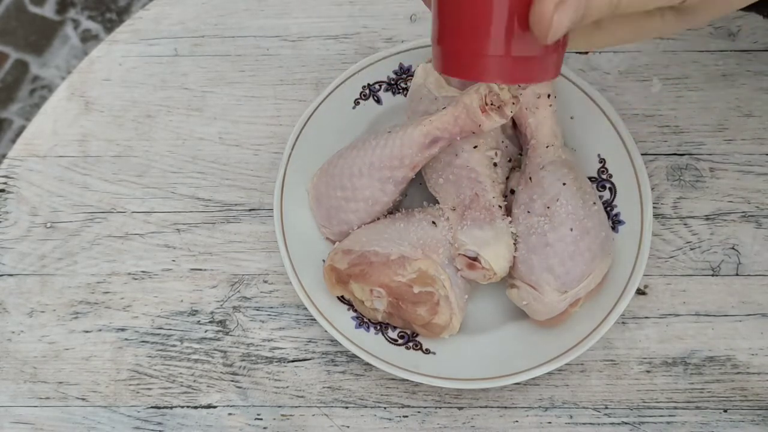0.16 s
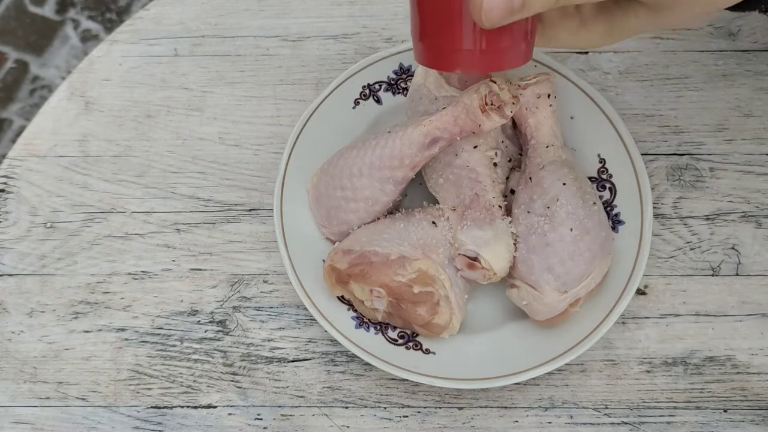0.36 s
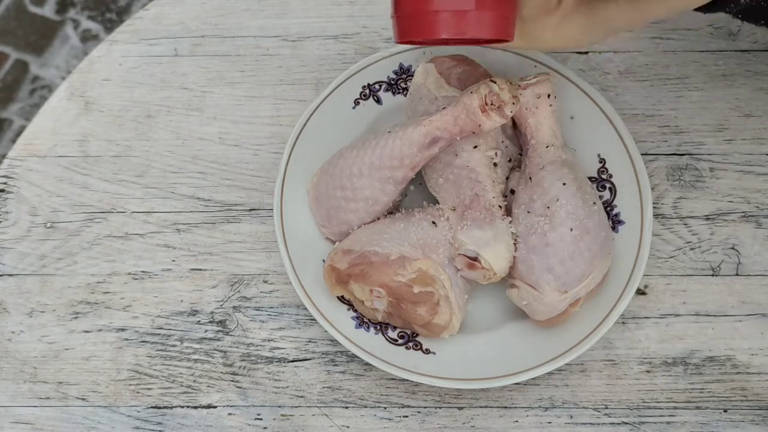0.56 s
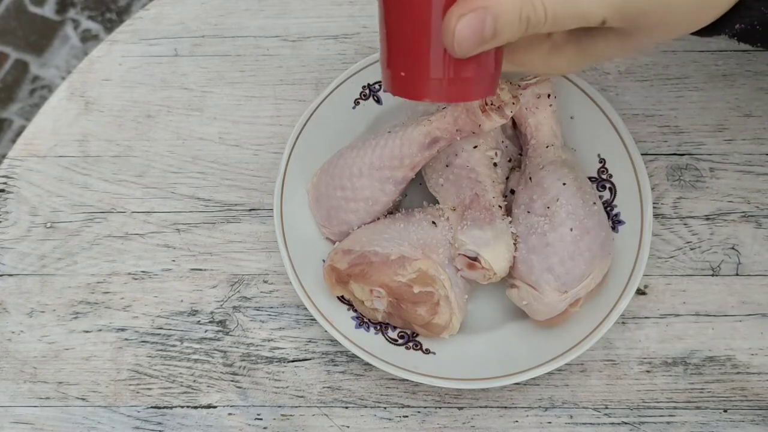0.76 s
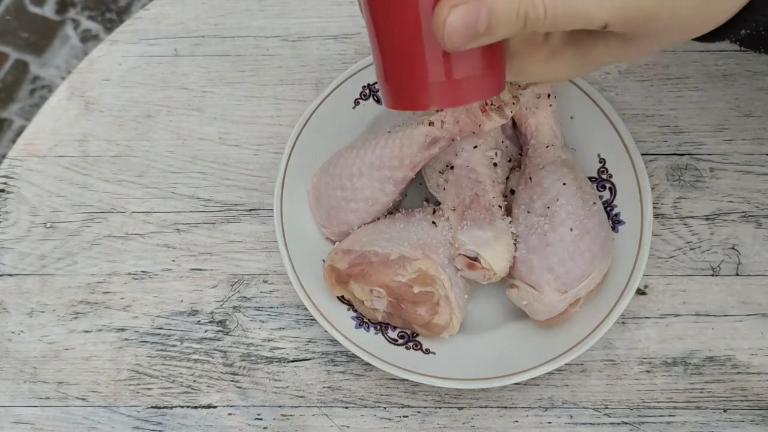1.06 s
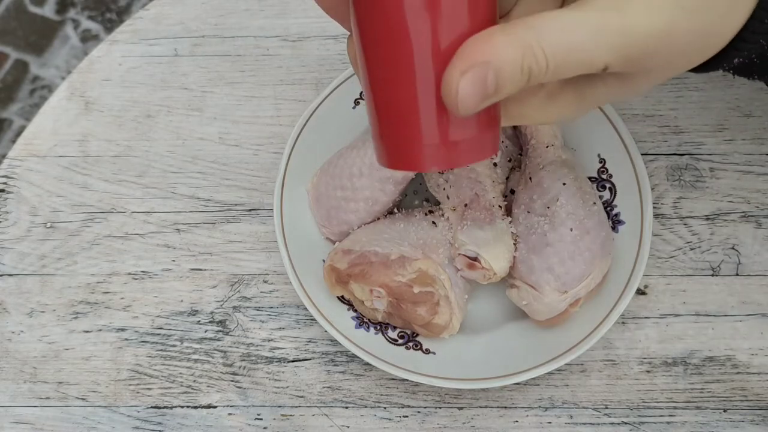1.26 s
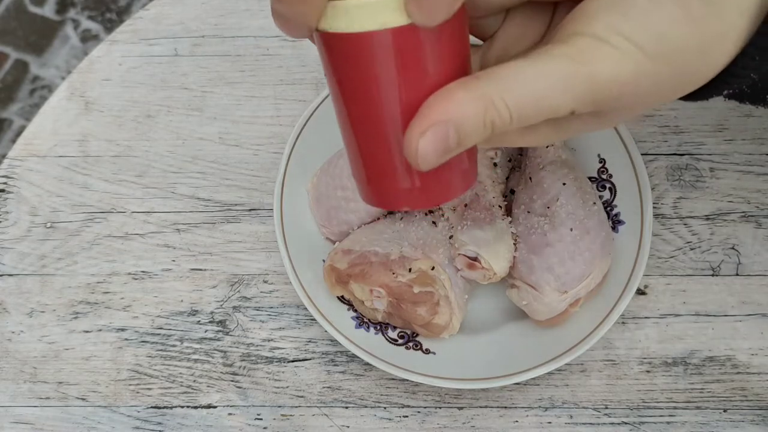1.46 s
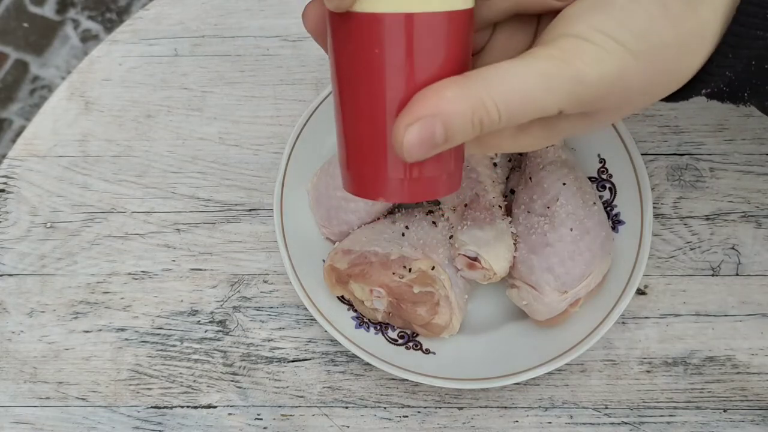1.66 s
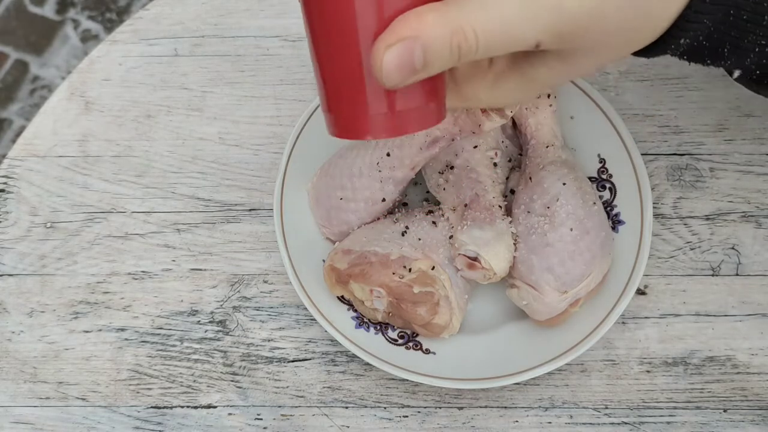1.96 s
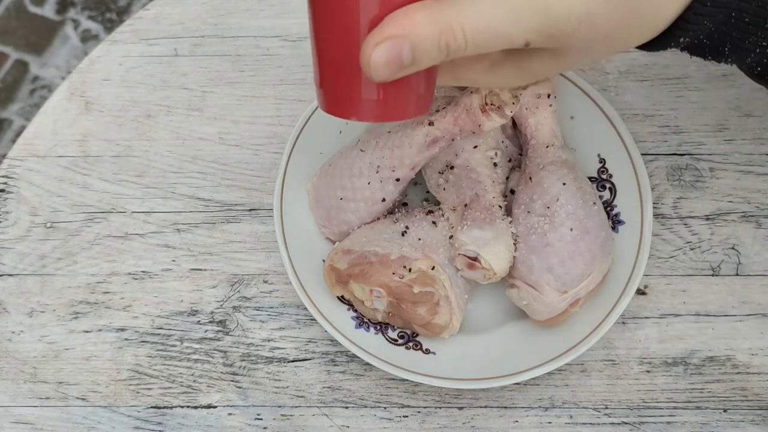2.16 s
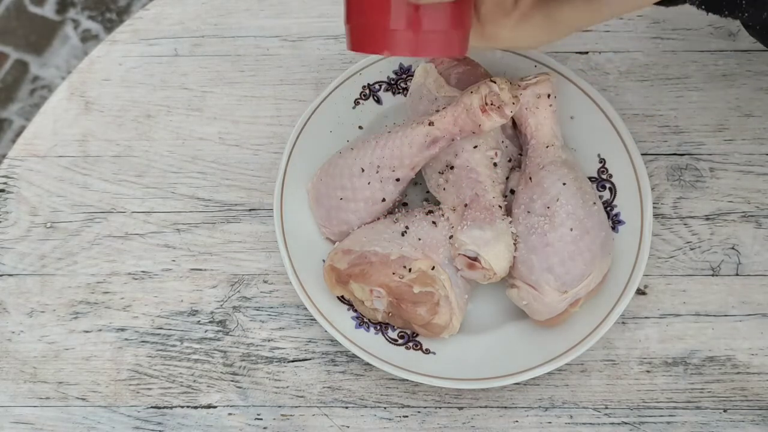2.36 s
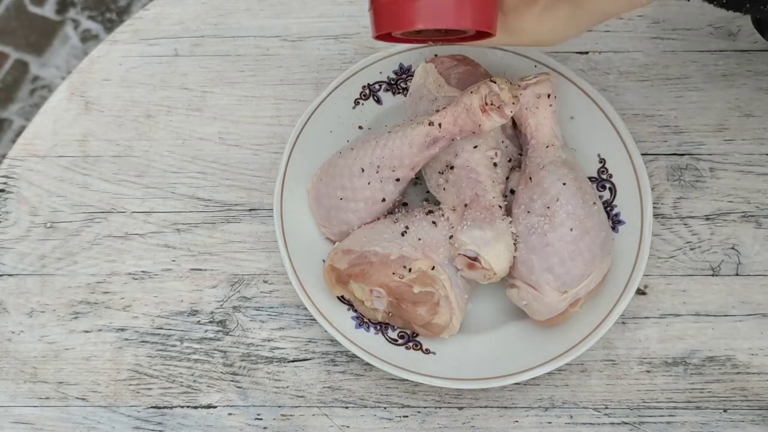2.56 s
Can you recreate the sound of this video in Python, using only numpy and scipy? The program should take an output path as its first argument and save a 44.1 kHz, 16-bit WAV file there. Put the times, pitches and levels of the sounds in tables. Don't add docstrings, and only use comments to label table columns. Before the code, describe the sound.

A plastic pepper mill grinds in short hand twists, close and dry outdoors. Faint grit opens, low hollow crunches follow from 0.2 to 0.6 s, then brighter rattling clicks until 1.0. Firmer twists crackle from 1.05 to 1.6, with sharp snaps around 1.72 and 1.85. More grinding comes at 2.1; the loudest cracks cluster at 2.4 and 2.52, then fade into faint rumble and hiss.

```python
import sys
import numpy as np
from scipy import signal
from scipy.fft import rfft, irfft
from scipy.io import wavfile
from scipy.ndimage import uniform_filter1d

SR = 44100
rng = np.random.default_rng(int(sys.argv[2]) if len(sys.argv) > 2 else 0)


def waveform_to_disk(signal):
    frames = np.transpose(np.atleast_2d(signal))
    scaled = np.clip(frames, -1, 1) * 32767
    samples = np.round(scaled).astype(np.int16)
    wavfile.write(sys.argv[1], SR, samples)


def attenuation_scalar(level_db):
    decades = np.asarray(level_db, float) / 20
    return 10 ** decades


N = 119070

# (frequency [Hz], density [dB per Hz])
AIR_SHARED = [(15, -58), (25, -31), (129, -5.5), (274, -19), (457, -17.5), (1380, -23), (1530, -20),
              (2560, -30), (15500, -29.5)]
AIR_DIFFERENCE = [(15, -44), (25, -24.5), (684, -22.5), (762, -24), (919, -17), (997, -30), (1200, -12.5),
                  (1340, -25), (15500, -51)]
# (time [s], level [dB], pitch [Hz],
# decay [s])
CHIPS = [(0.4802, -27.5, 870, 0.0025), (0.491, -31, 1500, .002), (0.5, -31.5, 414, 0.025),
         (0.517, -27, 7070, 0.0024), (1.724, -14, 4110, 0.0031), (1.724, -14, 9700, 0.0021),
         (1.7245, -24, 6690, 0.0053), (1.726, -20, 840, 0.0026), (1.729, -28, 9330, 0.0036),
         (1.765, -31.5, 10100, .002), (2.086, -25, 2810, 0.0021), (2.0861, -22.5, 6940, .002),
         (2.087, -30, 5760, .002), (2.144, -24, 3070, 0.0023), (2.405, -22, 8430, 0.0038),
         (2.4057, -13, 10100, 0.0019), (2.4074, -16, 5820, 0.0028), (2.406, -25, 8700, .0015),
         (2.409, -16, 1123, 0.0031), (2.411, -21.5, 9100, 0.0026), (2.422, -22, 8600, 0.0034),
         (2.514, -15.5, 7030, 0.0038), (2.517, -28, 5100, 0.0015), (2.563, -38, 7100, 0.0026),
         (0.222, -36, 13600, 0.022), (0.241, -31, 7100, .002), (1.392, -26, 6860, 0.0023),
         (1.512, -33.5, 705, .004)]
# (time [s], level [dB], pitch [Hz], decay [s])
CRUNCHES = [(0.308, -36, 470, 0.0046), (0.326, -34, 454, 0.01), (0.343, -33, 424, 0.01),
            (0.365, -39, 493, 0.0071), (0.595, -36, 324, .01), (0.615, -40, 372, 0.0074),
            (0.638, -43, 193, 0.014), (0.763, -41, 1500, 0.0027), (0.814, -33, 1680, .004),
            (0.846, -34.5, 1450, 0.0055), (1.093, -31, 334, 0.0087), (1.113, -35.5, 340, 0.0087),
            (1.156, -25, 2050, 0.0036), (1.207, -33.5, 1700, .004), (1.228, -31.5, 1294, 0.0058),
            (1.243, -34.5, 1090, 0.0046), (1.355, -38, 1080, 0.0038), (1.622, -31, 696, 0.0028),
            (2.454, -34, 400, 0.01), (1.065, -52, 70, .015), (1.723, -53, 70, .015),
            (1.846, -47.5, 85.5, .015), (2.409, -52, 70, .015), (2.516, -49, 85, .015)]
# (start [s], length [s], body level [dB], shell level [dB], burr level [dB])
TWISTS = [(0, 0.15, -62, -69, -59.5), (0.207, 0.071, -58.5, -53.5, -43), (0.298, 0.062, -47.5, -53.5, -46),
          (0.38, 0.039, -57.5, -59, -53), (0.487, 0.056, -42, -52, -48), (0.576, 0.12, -47, -47, -46),
          (0.769, 0.14, -51.5, -48, -47.5), (0.882, 0.064, -70, -53.5, -55.5),
          (1.043, 0.059, -45, -48.5, -48.5), (1.137, 0.11, -46, -48.5, -50),
          (1.357, 0.16, -51.5, -46.5, -47.5), (1.61, 0.024, -58.5, -54, -53.5),
          (1.743, 0.017, -48.5, -43, -44.5), (1.806, 0.012, -59, -59.5, -59),
          (1.853, 0.075, -46.5, -44, -48), (2.106, 0.099, -53, -45.5, -48.5),
          (2.202, 0.067, -53, -63, -52.5), (2.328, 0.017, -52.5, -53, -55.5),
          (2.419, 0.037, -59, -40.5, -41), (2.51, 0.063, -54, -48, -42), (2.6, 0.15, -83, -70, -66)]
# (time [s], crack level [dB], crack pitch [Hz], body share [dB], burr share [dB])
SNAPS = [(0.006, -50, 660, -13, 22), (0.041, -48, 643, -19, 13), (0.084, -50, 720, -3.5, 21),
         (0.094, -44, 605, -24, 12.5), (0.133, -48, 630, -17, 14), (0.175, -46.5, 4940, -13, 20.5),
         (0.208, -34.5, 657, -7, -7), (0.251, -34.5, 5700, -23, 12), (0.264, -28, 1790, -6.5, -17),
         (0.29, -29.5, 950, -16, -7), (0.344, -41, 850, 5, -10), (0.437, -49, 1620, -17, 14),
         (0.457, -35, 830, -8.5, -6), (0.479, -46, 840, -18, -20), (0.522, -28.5, 744, -3, 5.5),
         (0.581, -32, 950, -13, -22), (0.669, -25.5, 1880, -28, 4), (0.678, -28.5, 1870, -31, -12),
         (0.791, -29.5, 1814, -35, -11), (0.859, -28, 1660, -29, -13), (0.881, -25, 1756, -32, 2.5),
         (0.906, -28.5, 1770, -28, -15), (0.95, -42, 620, 7.5, 11),
         (1.052, -22.5, 933, -5.5, 2.5), (1.067, -23, 765, 0, 4), (1.15, -23.5, 2060, -9, 1.5),
                (1.195, -28, 2150, -22, -1), (1.381, -27.5, 2000, -17, 5), (1.401, -28.5, 1650, -11.5, -8),
                (1.463, -23.5, 1574, -44, 1), (1.498, -32, 1910, -11, -20), (1.547, -39.5, 620, -4.5, -1),
                (1.6203, -21.5, 2500, -37, -6), (1.7236, -17.5, 1406, -13.5, 3),
                (1.729, -19.5, 2230, -12, 2), (1.764, -29.5, 780, -36, -4), (1.846, -22, 2090, -11, -11),
                (1.917, -29, 1160, -12, -17), (1.933, -24.5, 2010, -44, 1.5),
         (2.0848, -29, 810, -11.5, 2.5), (2.143, -24.5, 846, -11.5, 5), (2.177, -26, 800, -43, -5),
              (2.239, -38.5, 780, -1.5, -15), (2.267, -37, 770, -3, -11), (2.31, -40, 1020, -7.5, -15),
              (2.332, -28, 1430, -19, -7), (2.342, -23, 694, -17.5, -4.5), (2.406, -19, 1407, -10.5, 4.5),
              (2.408, -11.5, 777, -11, 1.5), (2.42, -21.5, 1000, -9, -3), (2.437, -38, 1760, -6, -8),
              (2.446, -29.5, 775, 0.5, -9), (2.463, -30, 660, 0, 1), (2.497, -26.5, 1930, -30, -10),
              (2.512, -18.5, 764, -15, 5.5), (2.516, -12, 2054, -18.5, -2), (2.528, -21, 1430, -19, -29),
              (2.534, -20.5, 2050, -14.5, -22), (2.549, -26.5, 1850, -30, -8),
              (2.563, -26.5, 1820, -44, -2), (2.584, -32.5, 2010, -26, -17), (2.691, -37, 606, -16, -5)]
# (frequency [Hz], width [Hz], level [dB])
BODY_MODES = [(287, 94, -0.5), (417, 111, -1), (660, 215, 0), (950, 1240, -7)]
SHELL_MODES = [(1447, 400, -1.5), (1865, 178, 5.5), (2053, 434, 0.5), (2840, 630, -3), (4000, 3600, -9.5),
               (4980, 420, -1.5)]
BURR_MODES = [(7120, 340, 10), (8420, 500, 8), (9420, 5700, -1), (11510, 460, -4.5), (15700, 6600, -4)]

BODY, SHELL, BURR = 0, 1, 2
AIR_SHARED_DB, AIR_DIFFERENCE_DB = -59, -61
TABLE_DB, TABLE_T60_S = -13, 0.08
PING_RISE_S, PING_ROUGH = 0.00052, 0.11
PING_LAG_S, PING_PAN_DB = 0.00009, -0.5
JOLT_HZ = 55.3
ATTACK_S, RELEASE_S = 0.03, 0.027
UNEVEN_DB, UNEVEN_PER_S = -1.9, 8.8
GRIT_PER_S, GRIT_SPREAD_DB, RUB_DB = (400, 1100, 3000), 1.8, -8
SNAP_RISE_S, SNAP_DECAY_S, SNAP_DB = 0.0016, (0.0042, 0.0031, 0.002), (1.5, -1.5, -1)
KNOCK_DB = -8
BRIGHT_HZ = 1430
PATCH_DB, PATCH_PER_S = 3, 136
SNAP_PATCH = 0.34
LAG_S, PAN_DB = (0.000076, 0.00009, 0), (-0.5, 2.5, 1.5)
WIDE_DB = (-9, -6.5, -3)
EDGE_HZ, EDGE_DB = 10570, 8
MILL_LOW_HZ = 183
TOP_HZ, TOP_DB, CUT_HZ = 15500, -24, 16500


def unit(x):
    return x / np.sqrt(np.mean(x ** 2))


def walk(rate):
    k = int(SR / rate)
    once = uniform_filter1d(rng.standard_normal(N), k)
    return unit(uniform_filter1d(once, k))


def highpass(x, order, hz):
    return signal.sosfilt(signal.butter(order, hz, "high", fs=SR, output="sos"), x)


def coloured(points):
    f = np.fft.rfftfreq(N, 1 / SR) + 1
    hz, db = np.array(points).T
    shape = attenuation_scalar(np.interp(np.log(f), np.log(hz), db))
    return unit(irfft(rfft(rng.standard_normal(N)) * shape, N))


def air():
    mid = attenuation_scalar(AIR_SHARED_DB + 0.15 * walk(43)) * coloured(AIR_SHARED)
    side = attenuation_scalar(AIR_DIFFERENCE_DB + 3.0 * walk(17)) * coloured(AIR_DIFFERENCE)
    return np.array([mid + side, mid - side])


def table_scatter(x):
    t = np.arange(SR // 8) / SR
    h = rng.standard_normal(len(t)) * attenuation_scalar(-60 * t / TABLE_T60_S)
    return attenuation_scalar(TABLE_DB) * signal.fftconvolve(x, h / np.sqrt(np.sum(h ** 2)))[:N]


def pings(rows):
    out = np.zeros((2, 2 * N))
    d = np.arange(SR // 10) / SR
    for start, db, hz, decay in rows:
        jitter = rng.standard_normal((2, len(d)))
        env = attenuation_scalar(db) * (1 - np.exp(-(d / PING_RISE_S) ** 2)) * np.exp(-d / decay)
        drift = PING_ROUGH * np.sqrt(hz / 5000) * np.cumsum(jitter[0] + 0.56 * jitter, axis=1)
        lag = np.array([[PING_LAG_S * (hz < 6000)], [0]])
        i = int(start * SR)
        out[:, i:i + len(d)] += env * np.sin(2 * np.pi * hz * (d - lag) + drift)
    pan = attenuation_scalar(np.array([[PING_PAN_DB], [-PING_PAN_DB]]) / 2)
    return highpass(out[:, :N], 2, JOLT_HZ) * pan


def crunches():
    return pings(CRUNCHES)


def chips():
    return pings(CHIPS)


def effort(t, part):
    total = np.zeros(N)
    for row in TWISTS:
        start, length, level = row[0], row[1], row[2 + part]
        swell = np.clip((t - start) / ATTACK_S + 1, 0, 1) ** 2
        fade = np.exp(-np.maximum(t - start - length, 0) / RELEASE_S * 2)
        total += attenuation_scalar(level) * swell * fade
    return total


def grit(part):
    sign, rub = rng.standard_normal((2, N))
    struck = rng.random(N) < GRIT_PER_S[part] / SR
    clicks = struck * np.sign(sign) * attenuation_scalar(GRIT_SPREAD_DB * rng.exponential(size=N))
    return unit(clicks) + attenuation_scalar(RUB_DB) * rub


def snaps(part):
    burst, tone = np.zeros(2 * N), np.zeros(2 * N)
    d = np.arange(SR // 20) / SR
    env = (1 - np.exp(-(d / SNAP_RISE_S) ** 2)) * np.exp(-(d / SNAP_DECAY_S[part]) ** 1.11)
    knock = attenuation_scalar(KNOCK_DB) * np.sin(np.pi * np.minimum(d / SNAP_RISE_S, 1))
    for start, db, hz, body_db, burr_db in SNAPS:
        size = attenuation_scalar(db + (body_db, 0, burr_db)[part])
        noise = rng.standard_normal(len(d))
        push = env * np.sign(noise)
        i = int(start * SR)
        if part == BODY:
            push = push + knock
        if part == SHELL:
            push = push * min(hz / BRIGHT_HZ, 1) ** 2
            tone[i:i + len(d)] += size * env * np.sin(2 * np.pi * hz * d + 0.13 * np.cumsum(noise))
        burst[i:i + len(d)] += size * attenuation_scalar(SNAP_DB[part]) * push
    return burst[:N], tone[:N]


def ring(drives, modes):
    total = 0
    for k, (hz, width, db) in enumerate(modes):
        b, a = signal.iirpeak(hz, hz / width, SR)
        total = total + (-1) ** k * attenuation_scalar(db) * signal.lfilter(b, a, drives[k])
    return total


def ports(shared, other, part):
    shift = np.exp(-2j * np.pi * np.fft.rfftfreq(N, 1 / SR) * LAG_S[part])
    late = irfft(rfft(shared) * shift, N)
    fizz = attenuation_scalar(EDGE_DB) * highpass(other, 4, EDGE_HZ)
    left = attenuation_scalar(PAN_DB[part] / 2) * (late + other + fizz)
    right = attenuation_scalar(-PAN_DB[part] / 2) * (shared - other)
    return left, right


def mill():
    t, out = np.arange(N) / SR, 0
    load = walk(UNEVEN_PER_S)
    for part, modes in enumerate((BODY_MODES, SHELL_MODES, BURR_MODES)):
        click = np.eye(1, 4096)[0]
        gain = 1 / np.sqrt(np.sum(ring([click] * len(modes), modes) ** 2))
        uneven = attenuation_scalar(UNEVEN_DB * (0.31 * load + 0.23 * walk(UNEVEN_PER_S)))
        push = grit(part) * effort(t, part) * uneven
        burst, tone = snaps(part)
        patch_db = np.array([PATCH_DB * walk(PATCH_PER_S) for _ in modes])
        drives = push * attenuation_scalar(patch_db) + burst * attenuation_scalar(SNAP_PATCH * patch_db)
        shared = gain * ring(drives, modes) + tone
        scrambled = drives * np.sign(rng.standard_normal(N))
        other = attenuation_scalar(WIDE_DB[part]) * gain * ring(scrambled, modes)
        out = out + np.array([p + table_scatter(p) for p in ports(shared, other, part)])
    return highpass(out, 3, MILL_LOW_HZ)


def scene():
    return air() + crunches() + chips() + mill()


def band_limit(x):
    return signal.sosfilt(signal.butter(12, 16630, fs=SR, output="sos"), x)


def record(dry):
    low = signal.sosfiltfilt(signal.butter(12, TOP_HZ, fs=SR, output="sos"), dry)
    top = signal.sosfiltfilt(signal.butter(16, CUT_HZ, fs=SR, output="sos"), dry - low)
    return band_limit(low + attenuation_scalar(TOP_DB) * top)


dry = scene()
out = record(dry)
waveform_to_disk(out)
```